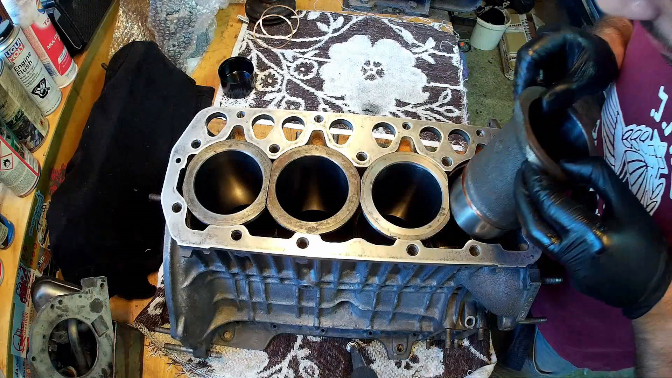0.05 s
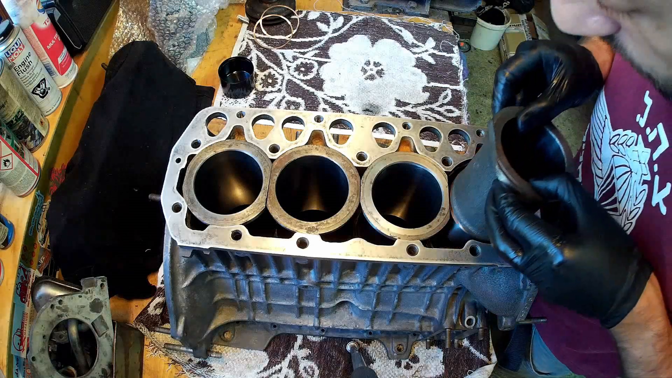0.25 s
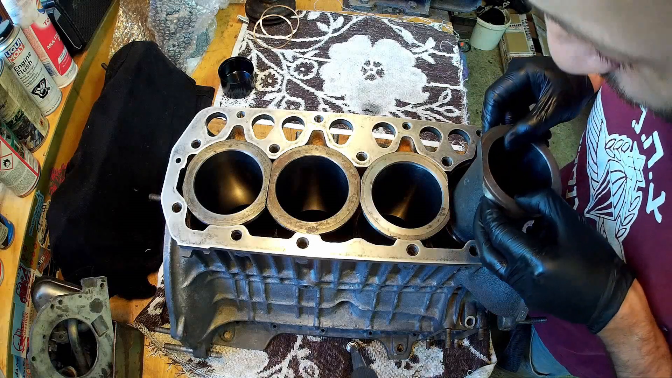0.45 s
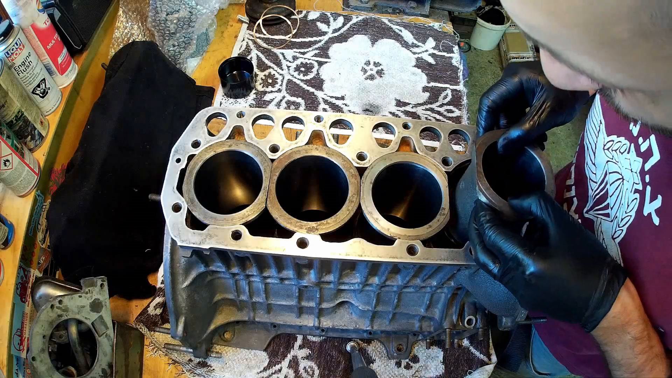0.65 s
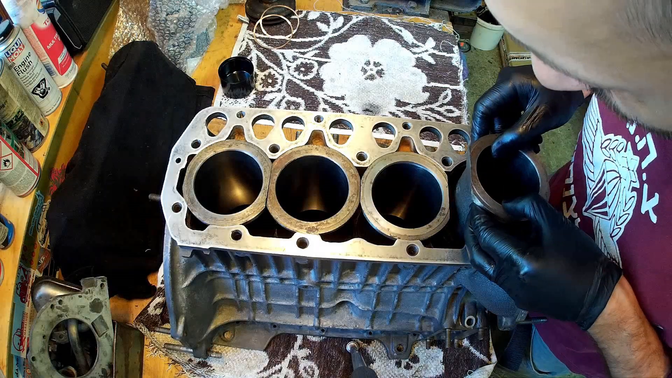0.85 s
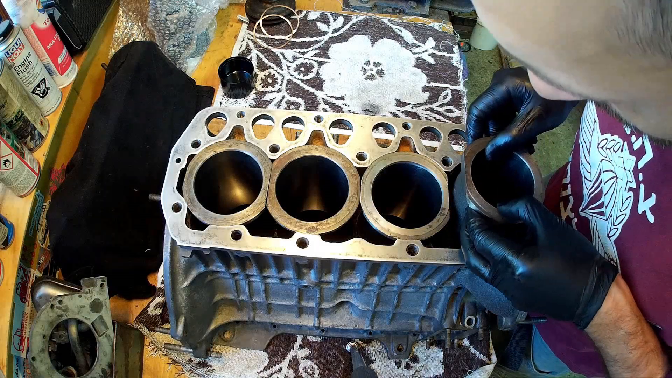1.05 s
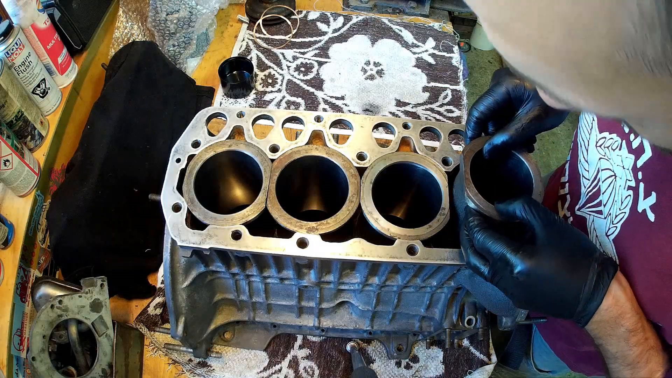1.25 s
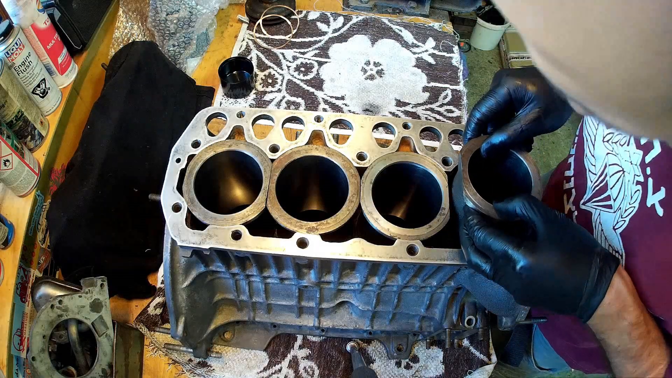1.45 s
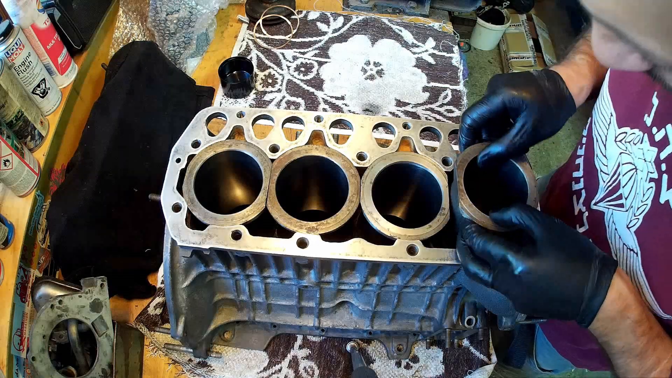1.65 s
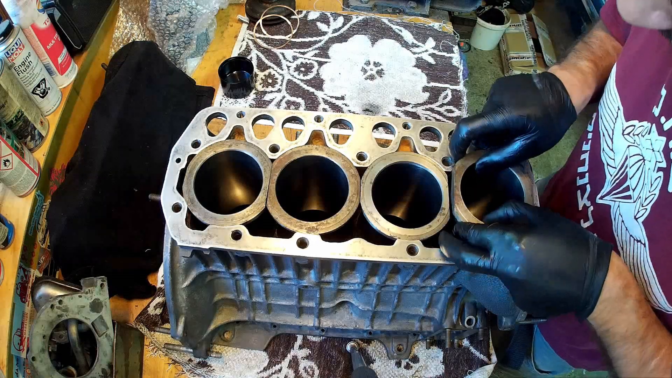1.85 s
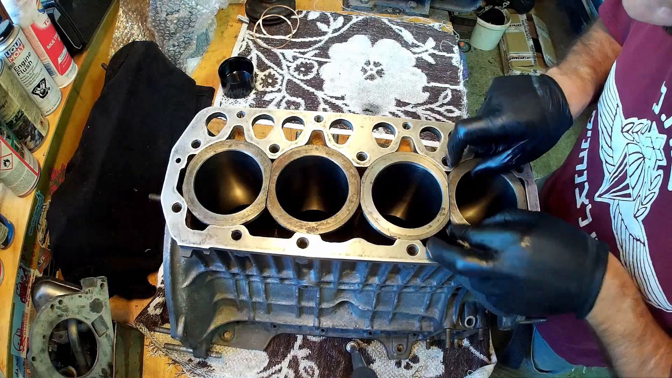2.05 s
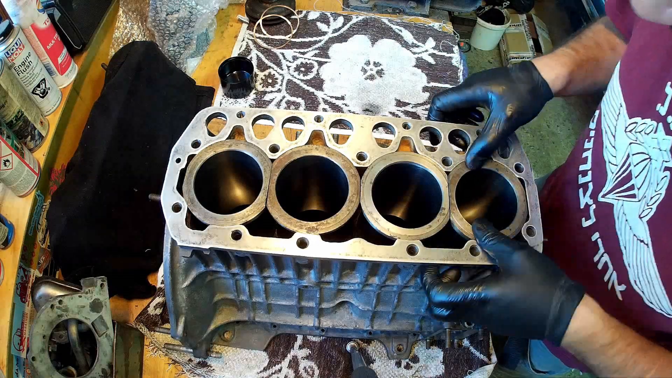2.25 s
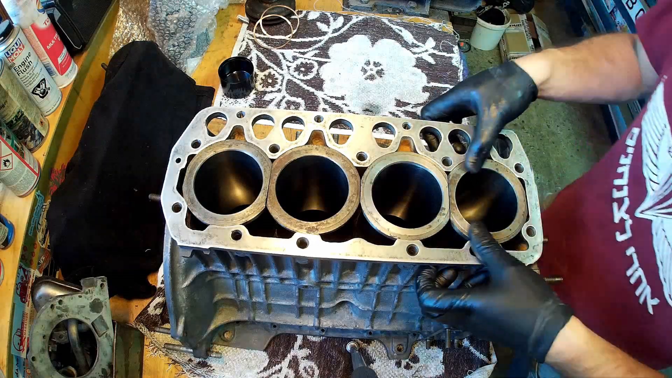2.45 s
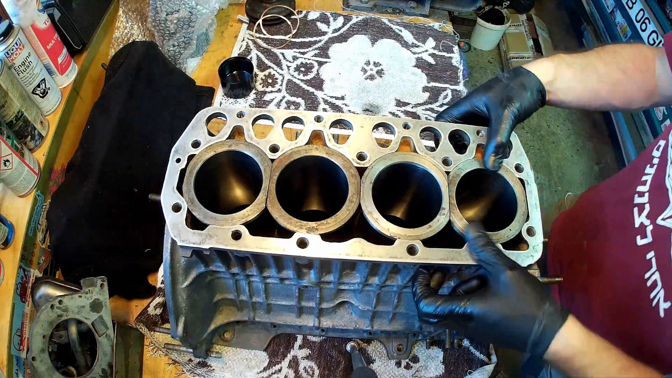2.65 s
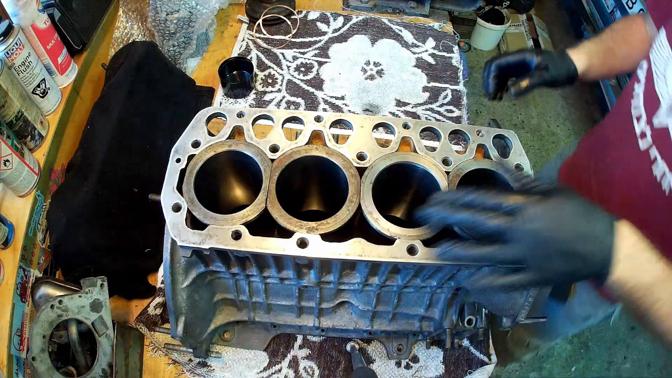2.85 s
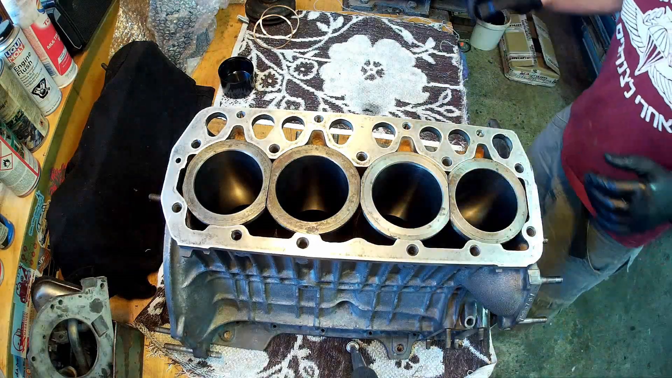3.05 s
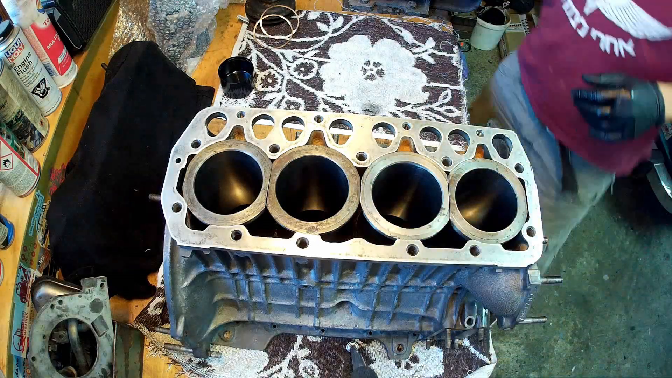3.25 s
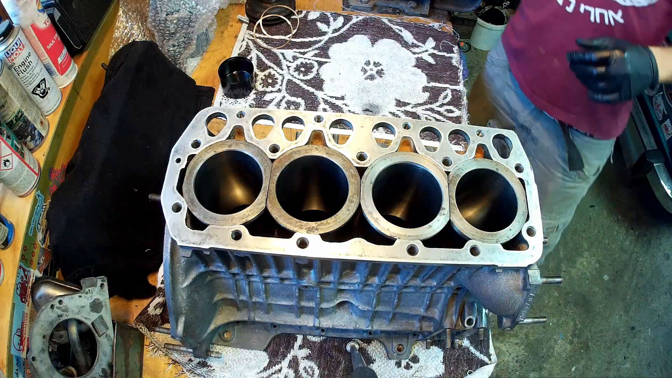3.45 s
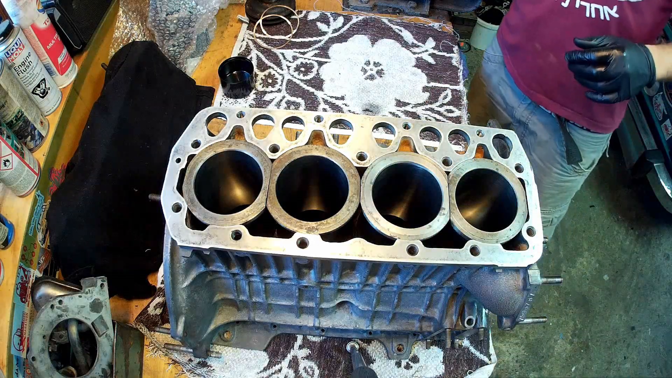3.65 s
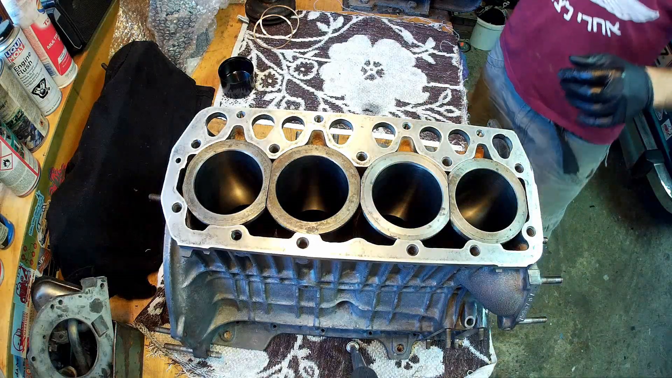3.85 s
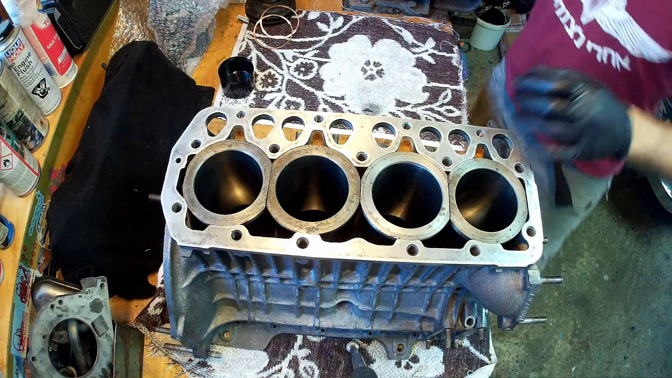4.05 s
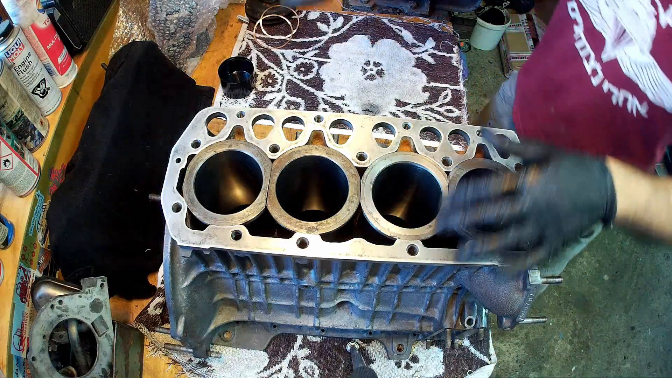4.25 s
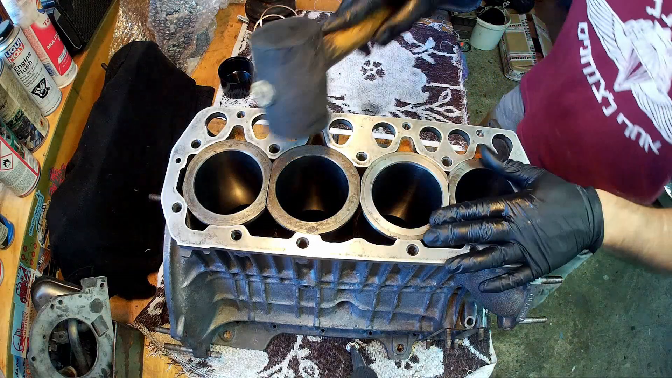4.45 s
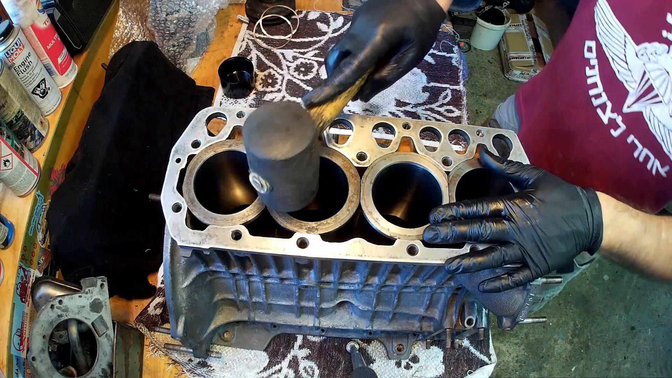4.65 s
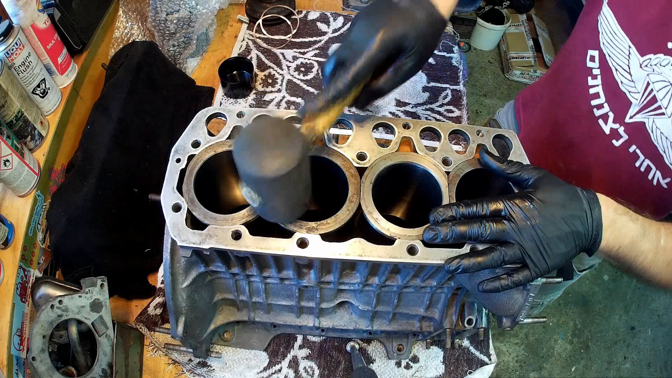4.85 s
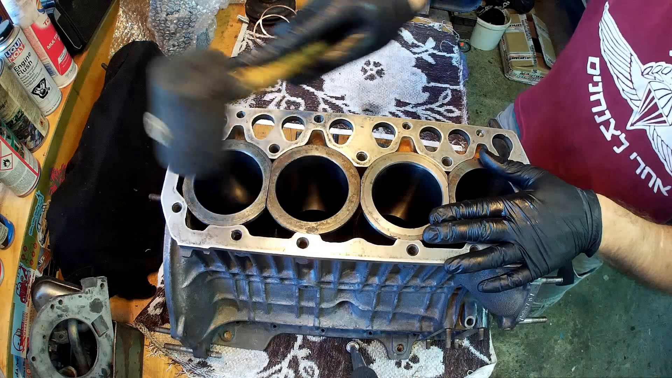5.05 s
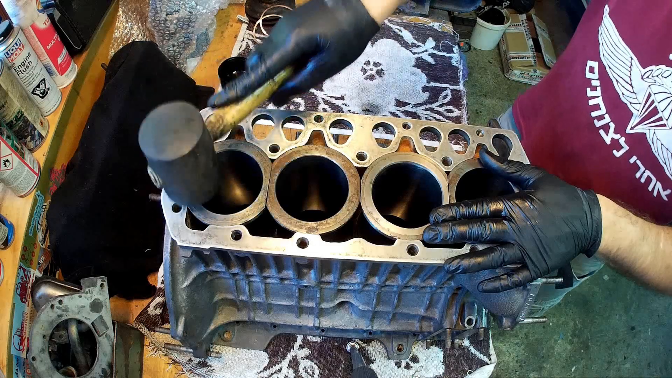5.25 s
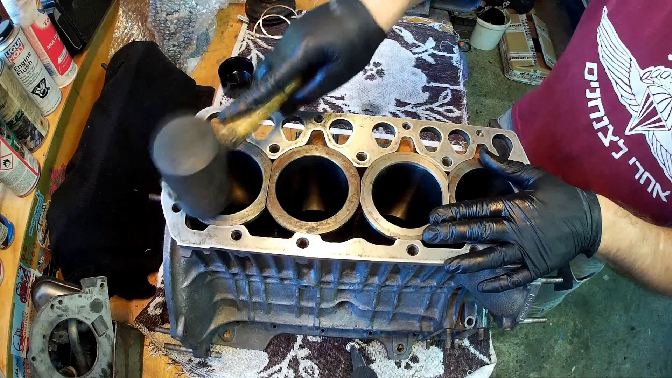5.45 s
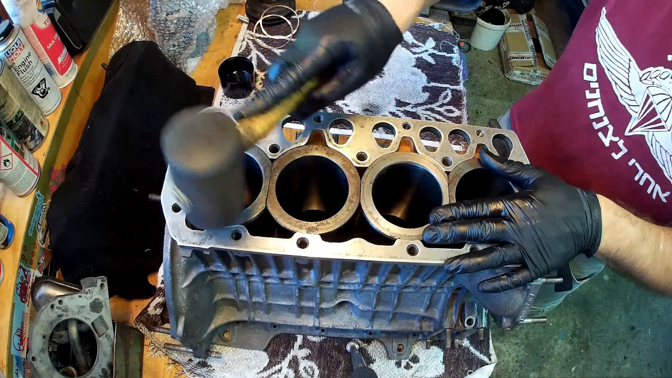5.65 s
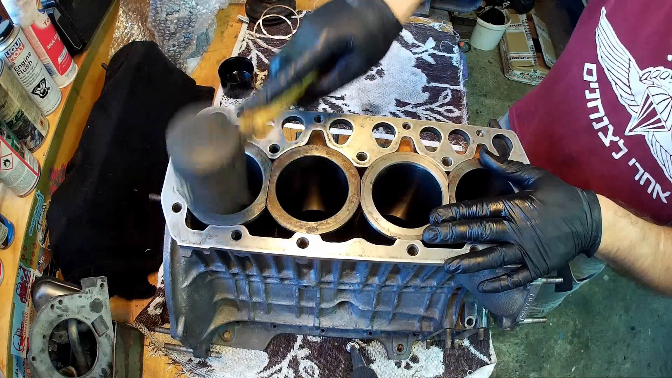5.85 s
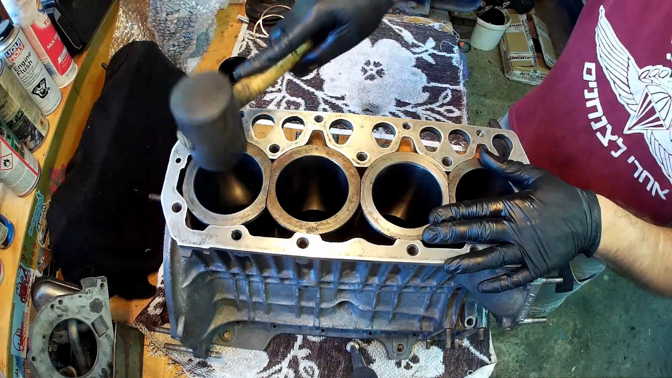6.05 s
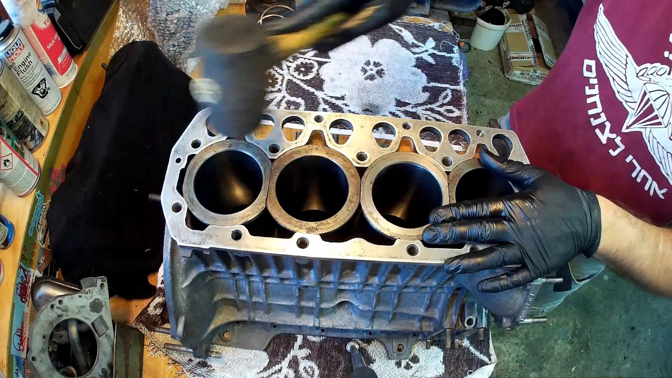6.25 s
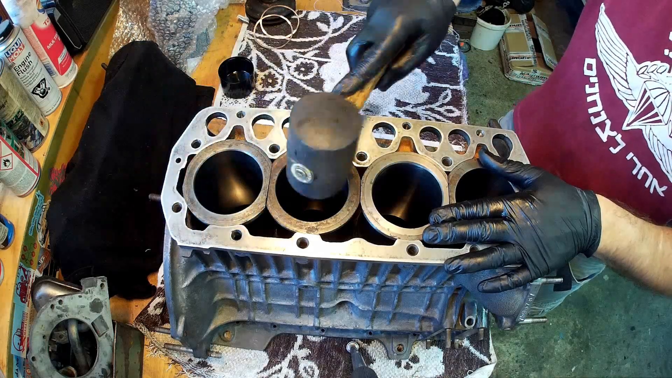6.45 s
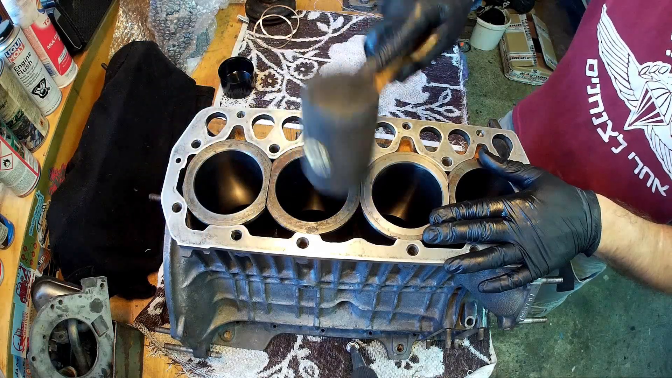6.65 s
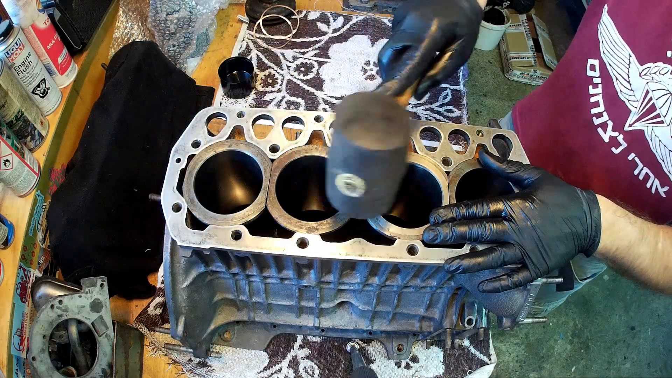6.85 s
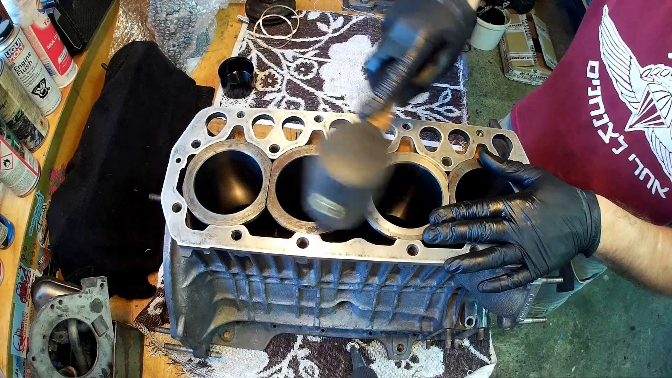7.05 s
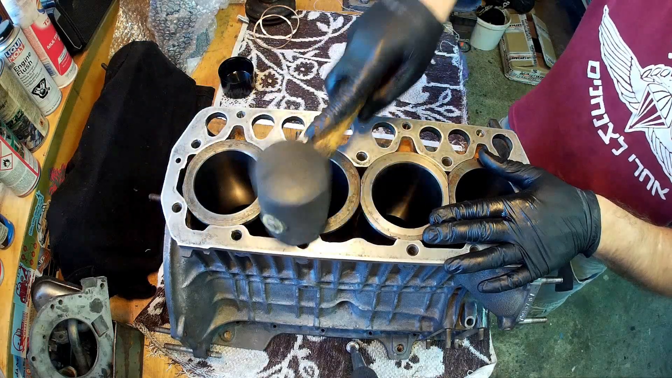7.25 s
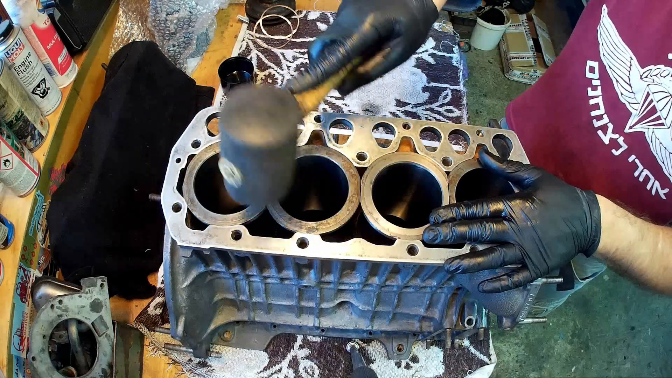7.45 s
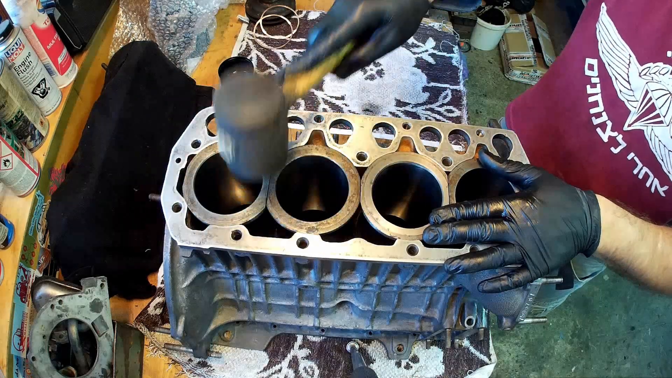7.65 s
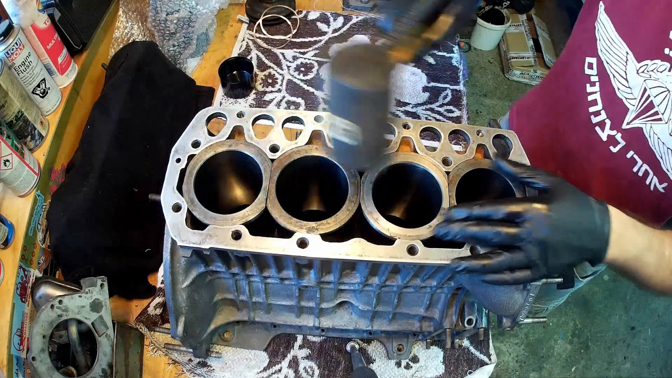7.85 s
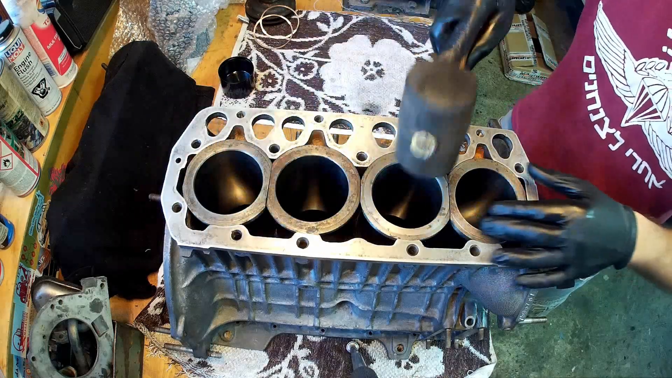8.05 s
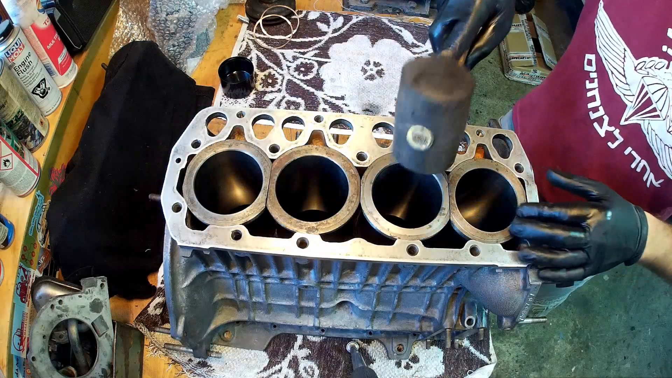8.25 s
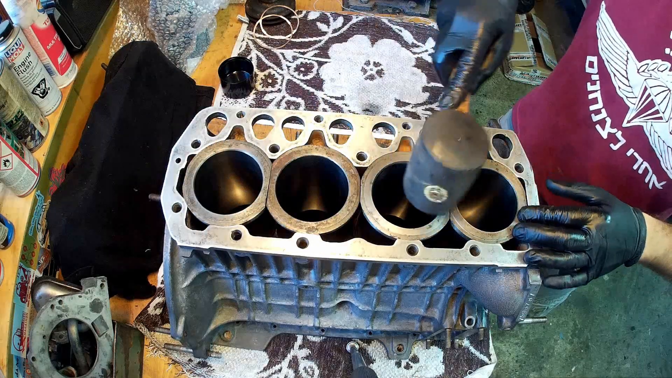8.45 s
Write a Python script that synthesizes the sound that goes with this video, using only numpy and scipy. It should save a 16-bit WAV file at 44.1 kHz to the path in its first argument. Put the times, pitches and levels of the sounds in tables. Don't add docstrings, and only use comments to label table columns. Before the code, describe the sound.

Soft thuds and faint bright ticks of hand-held cast iron come first, then scrapes and a quick clunk with one bounce. After a lull with cloth and rubber rubbing, rubber mallet knocks arrive about three per second, uneven in strength and pitch, hollow and woody with damped metal ring and rattles. Close microphone, low hum and hiss, little room echo.

```python
import sys
import numpy as np
from scipy import signal
from scipy.fft import rfft, irfft, next_fast_len
from scipy.io import wavfile
from scipy.ndimage import map_coordinates

SR = 44100
rng = np.random.default_rng(int(sys.argv[2]) if len(sys.argv) > 2 else 0)


def generate_wav(sig):
    pcm = np.round(np.clip(np.atleast_2d(sig).T, -1, 1) * 32767).astype(np.int16)
    wavfile.write(sys.argv[1], SR, pcm)


def attenuation_scalar(level_db):
    decades = np.asarray(level_db, float) / 20
    return 10 ** decades


N = 375327
LIFE = np.arange(SR // 3) / SR

# (frequency [Hz], density [dB])
HISS = [(880, -44.5), (1500, -8), (3180, -7.5), (4690, -8), (5770, -9), (12900, -13), (15100, -18),
        (16000, -29)]
HUM = [(35, -45), (60, -4), (188, -3.5), (302, -6), (336, -7), (422, -8.5), (740, -13), (1280, -18.5),
       (4000, -36.5), (5200, -61.5), (8800, -120)]
RUMBLE = [(15, -6), (28, -3.5), (45, -3.5), (65, -5), (90, -17), (140, -67.5)]
# (time [s], rumble level [dB])
HANDLING = [(0, -59.5), (1.09, -57.5), (2.04, -47.5), (2.23, -56.5), (3.18, -59.5), (3.74, -54),
            (4.55, -59), (8.51, -58)]

# (time [s], level [dB], hardness [dB])
BUMPS = [(0.209, -54.5, 1), (0.329, -67, 14), (0.459, -48, 3), (0.856, -46, -7), (0.928, -51, -13),
         (1.152, -48.5, -6), (1.567, -46, -14), (1.683, -44.5, -4), (1.992, -56, 3), (3.421, -55, 8)]
# (time [s], level of each mode [dB] x 3, rise [s])
HOLLOW = [(0.666, -38, -37, -51, 0.01), (3.665, -51, -42, -46, 0.002)]
# (frequency [Hz], t60 [s])
BLOCK_MODES = [(165, 0.086), (360, 0.14), (750, 0.051)]
# (level [dB], slope [dB per dB of hardness])
BUMP_TONE = [(0, 0), (-14, .6), (0, 1)]

# (time [s], level [dB], hardness [dB])
TICKS = [(0.2107, -62, 3), (0.247, -65, -16), (0.329, -65.5, 4), (0.399, -65, -6), (0.5138, -65, -13),
         (0.6714, -62, -18), (0.7292, -70, -10), (0.8565, -57.5, -19), (0.8794, -65, -14),
         (0.9315, -68, -12), (0.9833, -65, -14), (1.0794, -73.5, -3)]
# (time [s], level of each mode [dB] x 3, rise [s])
PING = [(0.4603, -66, -67, -56.5, .002)]
# (frequency [Hz], t60 [s])
FREE_MODES = [(1900, 0.1487), (2820, 0.064), (4900, 0.093)]
# (level [dB], slope [dB per dB of hardness])
TICK_TONE = [(0, 0), (1.5, 1), (-1, 1)]

# (time [s], high level [dB], low level [dB], rise [s])
SNAPS = [(0.4609, -57, -53, 0.001072), (1.6779, -63, -40.5, 0.001), (1.9914, -64.5, -62, 0.0012),
         (2.9154, -53, -62.5, 0.001), (2.9781, -55, -68, 0.001), (3.6646, -64, -54, 0.001),
         (4.2234, -48.5, -45, 0.001)]
# (peak time [s], level [dB], 20 dB rise [s], 20 dB fall [s])
CLOTH_STROKES = [(3.185, -61, .04, .045), (3.24, -57, .035, .032), (3.3, -63, .05, .08),
                 (3.405, -61, .1, .05), (3.424, -48, .01, .2), (3.52, -54.5, .3, .08)]
RUBBER_STROKES = [(4.13, -66, .3, .4), (4.2245, -46.5, .006, .2), (4.247, -44.5, .04, .13),
                  (4.33, -59, .1, .3)]
# (frequency [Hz], density [dB])
CLOTH = [(350, -30), (500, 0), (800, -1.5), (1700, -6), (3100, -11), (3500, -26.5), (4800, -17.5),
         (6000, -29), (9000, -41)]
RUBBER = [(260, -37), (450, -14), (499, -28), (593, -5), (1290, -4.5), (1400, -2), (3770, -16.5),
          (4580, -12.5), (7000, -35.5), (9100, -64), (15400, -120)]

# (time [s], level of each mode [dB] x 4, rise [s])
CLINK = [(1.1446, -43, -56, -57.5, -57, 0.002)]
# (frequency [Hz], t60 [s])
GRIPPED_MODES = [(1884.8, 0.086), (2440, 0.0563), (2850, 0.1), (1300, .03)]

# (time [s], level [dB], depth [dB])
SCUFFS = [(1.65, -65, 11), (1.6759, -58.5, 11.5), (1.824, -52, 1), (1.8453, -48, -10), (1.9031, -58.5, -12),
          (1.992, -53.5, -7), (2.0198, -72, -2), (2.0368, -63, -9), (2.064, -54, -15), (2.0846, -51, -6),
          (2.1387, -41, -7)]
# (frequency [Hz], t60 [s])
GUIDED_MODES = [(1270, 0.08), (1570, 0.063), (2760, 0.073)]
# (level [dB], slope [dB per dB of depth])
SCUFF_TONE = [(0, 0), (0, 1), (-3, .3)]

# (time [s], bore pop [dB], bench boom [dB], iron ring [dB], smack [dB], landing place)
DROPS = [
    (2.152, -29.5, -43, -26.5, -56.5, "seat"),
    (2.177, -38, -38, -33.5, -66, "rebound"),
]
BLOWS = [(4.648, -13, -27, -11.5, -47.5, "edge"), (4.891, -14.5, -27.5, -18, -51.5, "centre"),
         (5.231, -10.5, -26, -19, -46, "end"), (5.482, -19.5, -26.5, -30.5, -54, "end"),
         (5.745, -17, -27, -30, -45, "square"), (6.078, -19, -26.5, -29.5, -49.5, "end"),
         (6.452, -21, -27.5, -24.5, -46, "end"), (6.733, -7.5, -29, -9, -42, "bridge"),
         (6.993, -16, -29.5, -29.5, -50, "far"), (7.283, -13.5, -27, -32, -49.5, "square"),
         (7.574, -14.5, -26.5, -23.5, -42, "lip"), (8.141, -21, -31, -34.5, -52.5, "seated"),
         (8.404, -26, -29.5, -32, -51, "near")]
LANDING = {"edge": (210, 970, 1215, 2320, 2), "centre": (451, 642, 1290, 2320, 2.5),
           "square": (400, 645, 1090, 2180, -1), "end": (232, 650, 1270, 2280, -1),
           "bridge": (211, 728, 1544, 1800, -3.5), "far": (350, 635, 1136, 2020, -4),
           "lip": (432, 659, 924, 2760, .5), "seated": (210, 745, 1264, 2113, -1.5),
           "near": (209, 717, 1220, 2750, 4), "seat": (275, 900, 930, 2305, 3),
           "rebound": (245, 533, 1270, 2780, -6)}
# (frequency [Hz], level [dB], t60 [s])
BORE_MODES = [(497, -2, 0.031), (635, 4.5, 0.027), (699, 1, 0.071), (880, -33, 0.15)]
BENCH_MODES = [(56.72, -15, 0.2), (92.1, -3.5, 0.47), (130.1, -5.5, 0.87), (161.1, 10, 0.22),
               (189.3, 2.5, 0.099), (272.2, 2, 0.27), (384.2, -10, 0.29), (424.34, -3, 0.23)]
IRON_MODES = [(1050, 7, 0.037), (1269, 6, 0.051), (1387.8, -10, 0.1), (1630, 1, 0.088), (1750, -7.5, .1)]
UPPER_MODES = [(2152, 7.5, 0.02), (2320, 2, 0.034), (2830, -0.5, 0.086), (3120, -0.5, 0.023)]
RIM_MODES = [(4060, -4, .03), (4500, -4, .03), (4785, -3, .045), (5150, -3, .03), (5500, -3, .03)]
# (low [Hz], high [Hz], bed level [dB], shudder t60 [s], puff [dB])
CLUTTER = [
    (380, 943, -13.5, 0.32, -4),
    (61.53, 327, -6.5, 0.51, -1),
    (870, 1600, 2, 0.29, -12.5),
    (1900, 3060, 8, 0.29, -1.5),
    (3500, 4600, -16, 0.24, 2.5),
]
# (bore [dB], bench [dB], iron [dB], upper [dB], rim [dB])
SHUDDER = (-15.8, -6.2, -12, -17, -12.5)

# (blow time [s], hop period [s], level [dB])
ROCKING = [(5.2305, .0232, -28.5), (5.4825, .0233, -30), (5.7435, .0229, -34), (7.283, .0229, -35.5)]
# (level [dB], hardness [dB])
HOPS = [(-12, 2), (-4, -7), (0, 0), (-9, -11)]
# (time [s], level [dB], hardness [dB])
RATTLES = [(6.124, -41, -2), (6.5894, -54, 0), (6.7694, -32, -6), (7.0799, -45, -9), (7.6391, -53, 0),
           (7.663, -44, -9)]
# (frequency [Hz], t60 [s])
LOOSE_MODES = [(2600, .028), (960, .065), (1450, .028), (4600, .022)]
# (level [dB], slope [dB per dB of hardness])
RATTLE_TONE = [(-6, 1), (-1, 0), (-4, 1.3), (-19, .6)]


def unit(x):
    return x / np.sqrt(np.mean(x ** 2) + 1e-20)


def coloured(spectrum, size=N):
    hz, db = np.transpose(spectrum)
    m = next_fast_len(size)
    log_hz = np.log(np.fft.rfftfreq(m, 1 / SR) + 1)
    gain = attenuation_scalar(np.interp(log_hz, np.log(hz + 1), db, -120, -120))
    return unit(irfft(rfft(rng.standard_normal(m)) * gain, m)[:size])


def wobble(rate, size=N):
    knots = rng.standard_normal(int(size * rate / SR) + 4)
    return map_coordinates(knots, [np.arange(size) * rate / SR])


def fade(t60, attack):
    return np.exp(-np.log(1000) * LIFE / t60) * (1 - np.exp(-LIFE / max(attack, 1e-5)))


def add(track, s, sound):
    track[round(s * SR):][:len(sound)] += sound


def shop():
    t = np.arange(N) / SR
    step_db = 2.8 * (1 + np.tanh((t - 3.385) / .015)) / 2
    hiss = attenuation_scalar(-71.5 + step_db + .3 * wobble(8)) * coloured(HISS)
    hum = attenuation_scalar(-58.5 + step_db + .7 * wobble(3.3)) * coloured(HUM)
    sway = np.zeros(N + SR)
    for s, _, boom_db, *_ in BLOWS:
        add(sway, s, attenuation_scalar(boom_db - 14) * fade(t60=.5, attack=.06))
    handling = attenuation_scalar(np.interp(t, *np.transpose(HANDLING)))
    rumble = (handling + sway[:N]) * attenuation_scalar(1.5 * wobble(6) - 7) * coloured(RUMBLE)
    return hiss + hum + rumble


def toned(rows, tone, rise):
    return [(s, *[db + base_db + slope * colour_db for base_db, slope in tone], rise)
            for s, db, colour_db in rows]


def contacts(table, modes, rough_db, spread, detune):
    track = np.zeros(N + SR)
    for s, *levels, rise in table:
        for db, (hz, t60) in zip(levels, modes):
            band = [(hz / spread, -20), (hz, 0), (hz * spread, -20)]
            grit = attenuation_scalar(rough_db) * coloured(band, size=len(LIFE))
            tone = np.sin(2 * np.pi * hz * (1 + detune * rng.standard_normal()) * LIFE)
            add(track, s, attenuation_scalar(db) * fade(t60, rise) * (tone + grit))
    return track[:N]


def bumps():
    touches = toned(BUMPS, BUMP_TONE, rise=.004) + HOLLOW
    return attenuation_scalar(-2) * contacts(touches, BLOCK_MODES, rough_db=4.7, spread=2.18, detune=.051)


def ticks():
    touches = toned(TICKS, TICK_TONE, rise=.0055) + PING
    return contacts(touches, FREE_MODES, rough_db=-20, spread=1.3, detune=.002)


def strokes(rows):
    t = np.arange(N) / SR
    slopes = [db - 20 * np.maximum((s - t) / rise, (t - s) / fall) for s, db, rise, fall in rows]
    return attenuation_scalar(np.max(slopes, axis=0))


def glove():
    drag = np.zeros(N)
    for rows, skin in [(CLOTH_STROKES, CLOTH), (RUBBER_STROKES, RUBBER)]:
        grains = attenuation_scalar(1.6 * wobble(180)) * coloured(skin)
        drag += strokes(rows) * unit(grains)
    snap_modes = [(4955, .016), (1940, .032)]  # (frequency [Hz], t60 [s])
    return drag + attenuation_scalar(-4.5) * contacts(SNAPS, snap_modes, rough_db=2, spread=2.2, detune=.03)


def clink():
    return contacts(CLINK, GRIPPED_MODES, rough_db=-10, spread=1.3, detune=.002)


def scuffs():
    touches = toned(SCUFFS, SCUFF_TONE, rise=.004)
    return contacts(touches, GUIDED_MODES, rough_db=-4, spread=1.3, detune=.007)


def ring(modes, attack):
    return sum(attenuation_scalar(db + 1.5 * rng.standard_normal()) * fade(t60, attack) * np.sin(2 * np.pi * hz * LIFE)
               for hz, db, t60 in modes)


def chatter(modes, lo, hi, floor_db, width):
    hz = np.geomspace(lo * .8, hi * 1.2, num=200)
    corners = np.log([hz[0], lo, hi, hz[-1]])
    bed = attenuation_scalar(floor_db + np.interp(np.log(hz), corners, [-29, 8, 5, -14]))
    peaks = sum(attenuation_scalar(db) / (1 + ((hz / f - 1) / width) ** 2) for f, db, _ in modes)
    return coloured(np.transpose([hz, 20 * np.log10(bed + peaks)]), size=len(LIFE))


def knocks(table, upper_db, wood_db, damping):
    track = np.zeros(N + SR)
    # (modes, attack [s], trim [dB], polarity); the bench first moves away from the microphone
    groups = [(BORE_MODES, .0003, -8, 1), (BENCH_MODES, .0015, -1, -1), (IRON_MODES, .0012, -8, 1),
              (UPPER_MODES, .0004, -8, 1), (RIM_MODES, .0006, -8, 1)]
    smack_colour = [(3000, -6), (3800, 0), (5900, 2), (7500, -2), (11000, -8), (16000, -11)]  # ([Hz], [dB])
    slap = (1 - LIFE / .00028) * np.exp(-LIFE / .00046) * (1 - np.exp(-LIFE / .00008))
    spring = np.exp(-((LIFE - .0047) / .0005) ** 2)
    press = attenuation_scalar(-5 / (1 + np.exp(np.clip((.008 - LIFE) / .00088, -30, 30))))
    for s, pop_db, boom_db, iron_db, smack_db, place in table:
        plank_hz, bore_hz, iron_hz, upper_hz, loose_db = LANDING[place]
        s += .0008
        ring_db = upper_db + .5 * iron_db + .3 * smack_db
        levels = [pop_db, boom_db, iron_db, ring_db, smack_db]
        tails = [*SHUDDER[:-1], SHUDDER[-1] + .5 * (iron_db + 24)]
        lumps = attenuation_scalar(loose_db + 1.5 * wobble(59.6, size=len(LIFE)))
        add(track, s, attenuation_scalar(ring_db + 1) * slap + attenuation_scalar(boom_db + 8.5) * spring)
        # (frequency [Hz], level [dB], t60 [s])
        picked = [[(bore_hz, 2.5, .04)], [], [(iron_hz, 4, .09)], [(upper_hz, .1, .045)], []]
        for db, tail_db, group, own, clutter in zip(levels, tails, groups, picked, CLUTTER):
            modes, attack, trim_db, polarity = group
            lo, hi, bed_db, t60, puff_db = clutter
            damped = [(hz, g, d * damping) for hz, g, d in modes + own]
            tone = polarity * attenuation_scalar(trim_db) * ring(damped, attack)
            puff = attenuation_scalar(puff_db) * fade(.034, .00059)
            shudder = attenuation_scalar(tail_db) * fade(t60 * damping, .009) * lumps
            noise = chatter(modes + own, lo, hi, bed_db, width=.024)
            add(track, s, attenuation_scalar(db) * (tone * press + (puff + shudder) * noise))
        plank_db = boom_db + wood_db - 11 * np.log2(plank_hz / 215)
        add(track, s, -attenuation_scalar(plank_db - 6) * ring([(plank_hz, 0, .07 * damping)], attack=.0018))
        air = fade(.014, .00068) + attenuation_scalar(-13) * fade(.12, .0042)
        add(track, s, attenuation_scalar(smack_db - 4) * air * coloured(smack_colour, size=len(LIFE)))
    return signal.sosfilt(signal.butter(2, 48, "high", fs=SR, output="sos"), track[:N])


def loose():
    hops = []
    for s, period, db in ROCKING:
        for k, (hop_db, hard_db) in enumerate(HOPS):
            hops.append((s + (k + 1) * period, db + hop_db, hard_db))
    touches = toned(hops + RATTLES, RATTLE_TONE, rise=.001)
    return attenuation_scalar(-3) * contacts(touches, LOOSE_MODES, rough_db=0, spread=1.5, detune=.015)


def scene():
    drops = knocks(DROPS, upper_db=-6, wood_db=24, damping=.33)
    blows = knocks(BLOWS, upper_db=-2.6, wood_db=7, damping=.83)
    mix = shop() + bumps() + ticks() + glove() + clink() + scuffs() + drops + blows + loose()
    return mix[None]


def low_pass(x):
    return signal.sosfilt(signal.butter(12, 16310, fs=SR, output="sos"), x)


def record(dry):
    m = next_fast_len(N)
    passed = np.fft.rfftfreq(m, 1 / SR) < 15800
    band = irfft(rfft(dry, m) * passed, m)[:, :N]
    return low_pass(band)


dry = scene()
out = record(dry)
generate_wav(out)
```